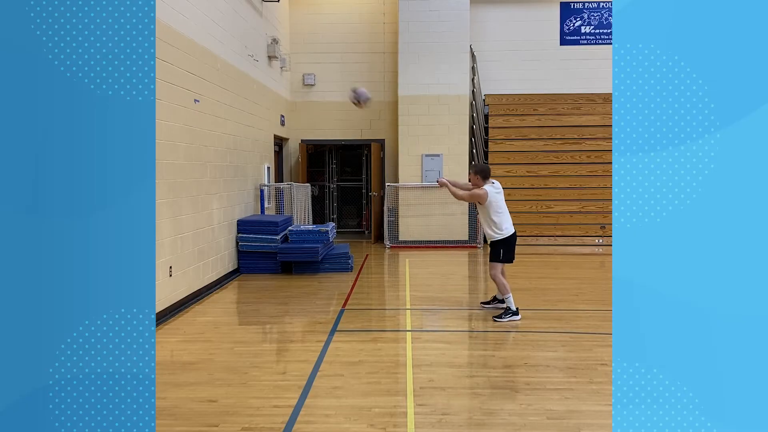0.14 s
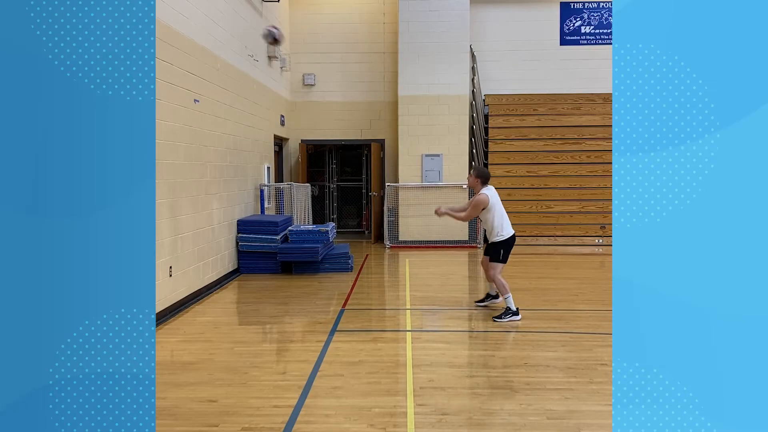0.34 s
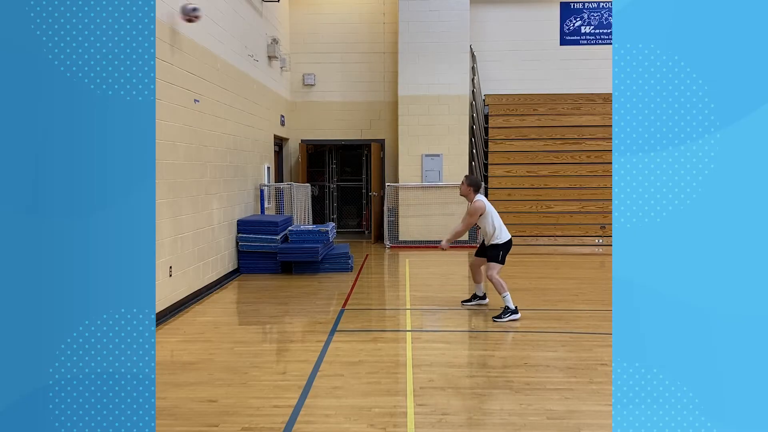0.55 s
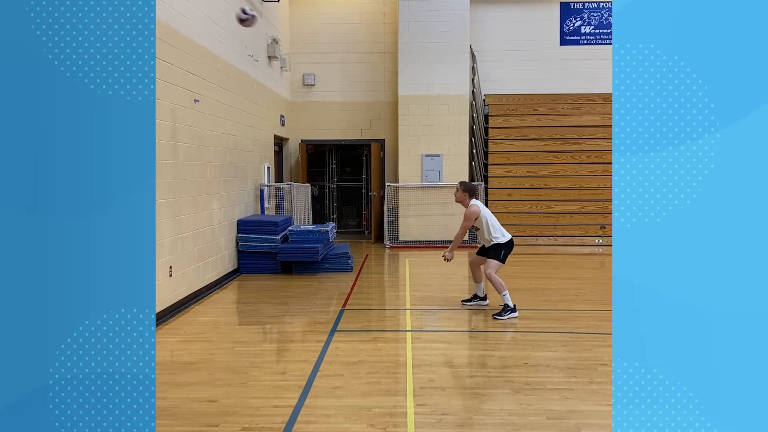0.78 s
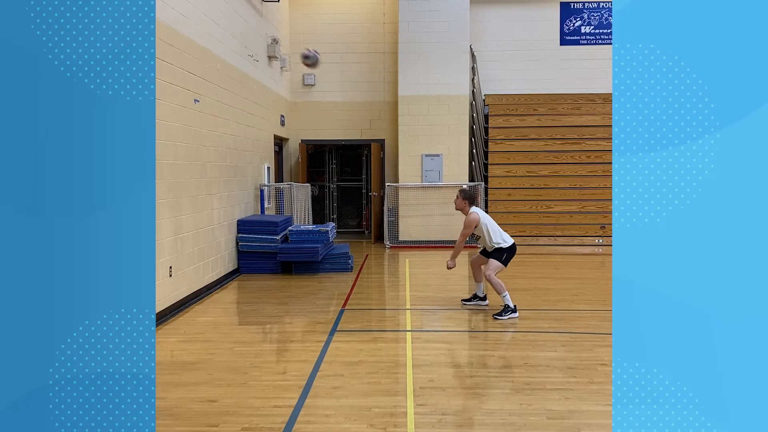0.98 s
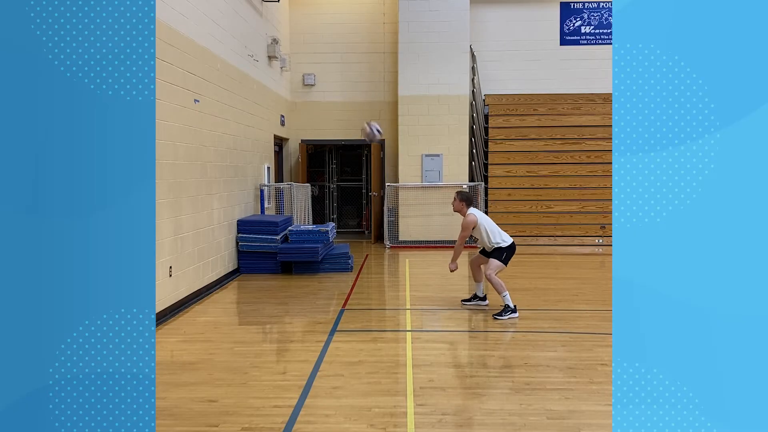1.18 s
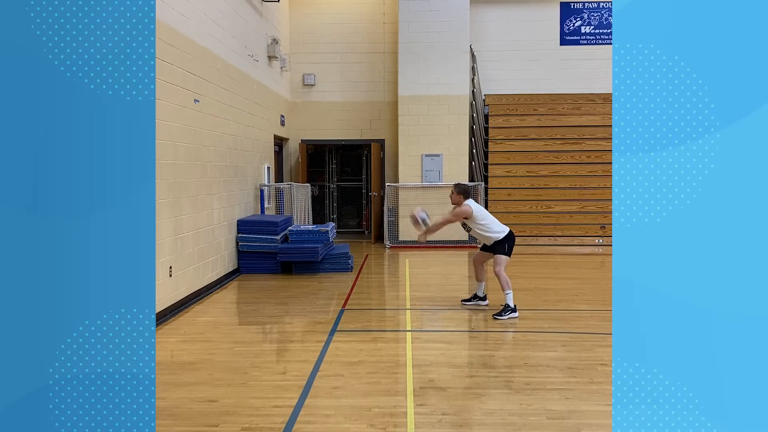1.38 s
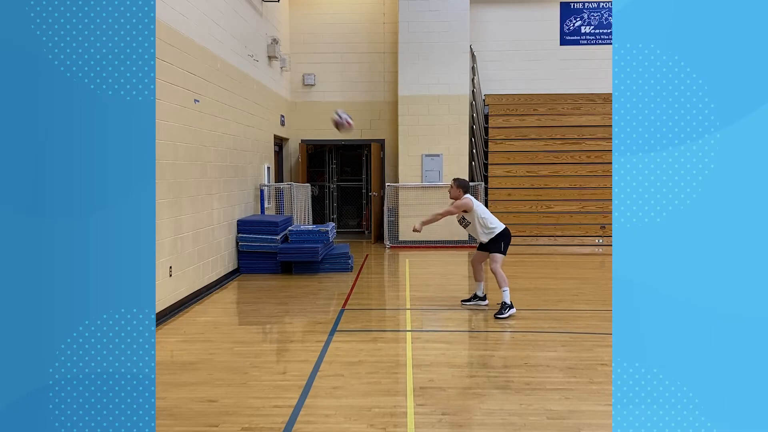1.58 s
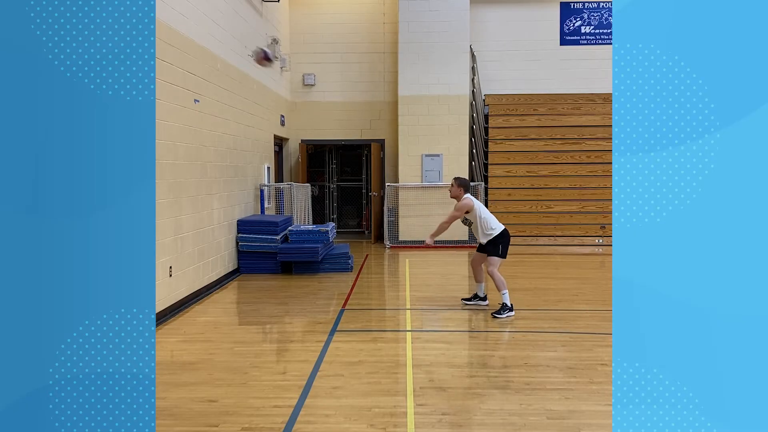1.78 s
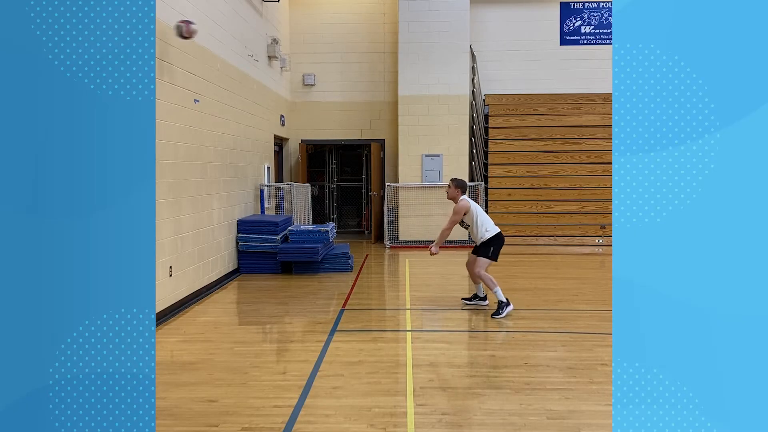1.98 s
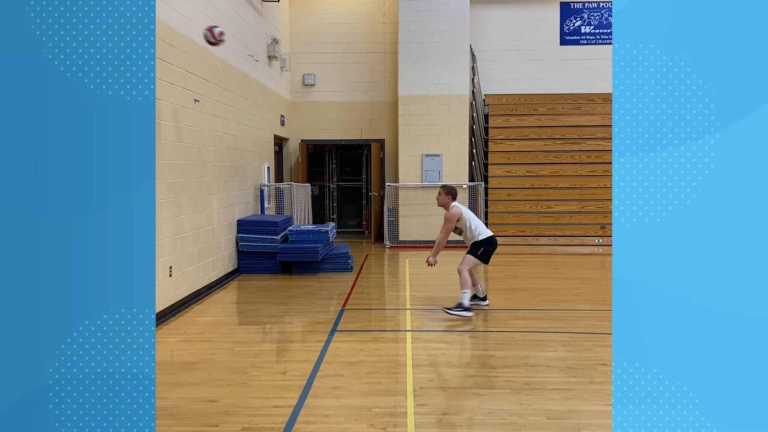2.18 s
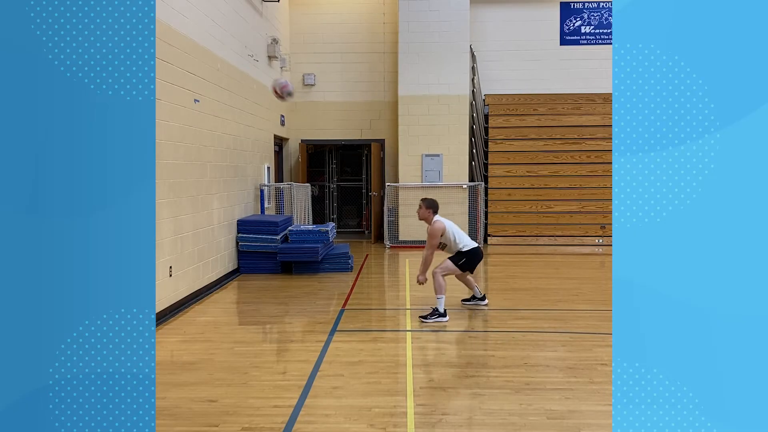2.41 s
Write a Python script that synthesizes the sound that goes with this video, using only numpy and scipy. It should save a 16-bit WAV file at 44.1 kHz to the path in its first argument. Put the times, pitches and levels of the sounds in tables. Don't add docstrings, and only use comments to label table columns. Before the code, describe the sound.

Volleyball smacked off bare forearms and knocking against a block wall, twice, in an echoing gym

```python
import sys
import numpy as np
from scipy import signal
from scipy.fft import rfft, irfft
from scipy.io import wavfile

SR = 44100
rng = np.random.default_rng(int(sys.argv[2]) if len(sys.argv) > 2 else 0)


def wav_record(signal):
    frames = np.transpose(np.atleast_2d(signal))
    bounded = np.clip(frames, -1, 1)
    quanta = np.round(bounded * 32767).astype(np.int16)
    wavfile.write(sys.argv[1], SR, quanta)


def volts(x):
    e = np.asarray(x, float) / 20
    return 10 ** e


N = 107956
LEAD, SIZE = 4410, 2 ** 17
HZ = np.maximum(np.arange(SIZE // 2 + 1) * SR / SIZE, 10)


def rms_one(x):
    return x / np.sqrt(np.mean(x ** 2) + 1e-20)


def at_hz(points, hz):
    table = np.array(points)
    return np.interp(np.log(hz), np.log(table[:, 0]), table[:, 1])


def ring(push, hz, t60):
    r, w = volts(-60 / (t60 * SR)), 2 * np.pi * hz / SR
    return signal.lfilter([0, np.sin(w)], [1, -2 * r * np.cos(w), r * r], push + 1e-18)


def coloured(points, size, tilt_db=0.0):
    hz = np.maximum(np.arange(size // 2 + 1) * SR / size, 10)
    colour = volts(at_hz(points, hz) + tilt_db * np.log2(hz / 2000))
    return rms_one(irfft(rfft(rng.standard_normal(size)) * colour, size))


def delay(s):
    return np.exp(-2j * np.pi * HZ * (s + LEAD / SR))


def add(heard, x, s, side):
    i = LEAD + int(round(s * SR))
    heard[:, i:i + len(x)] += x * np.array([[1], [side]])


# frequency [Hz], side over mid [dB].
DIFFUSE_SIDE = [(50, -36), (150, -25), (350, -13), (700, -3.5), (2000, -5.5), (5000, -4), (8000, -3),
                (13500, -3)]
# frequency [Hz], share [0-1].
PORT_LAG_SHARE = [(100, 0.6), (1000, .4), (4000, .6), (8000, .9)]


def wide(pair):
    lag = np.clip(at_hz(PORT_LAG_SHARE, HZ), 0, 1)
    side = 1j * lag * pair[0] + np.sqrt(1 - lag ** 2) * pair[1]
    return np.array([pair[0], side * volts(at_hz(DIFFUSE_SIDE, HZ))])


# frequency [Hz], side over mid [dB].
DIRECT_SIDE = [(50, -28), (150, -17), (350, -6), (700, -2), (1200, -4), (2700, 7), (7500, 8), (13500, 9)]


def facing(heard):
    return rfft(heard) * np.array([1 + 0 * HZ, 1j * volts(at_hz(DIRECT_SIDE, HZ))])


# frequency [Hz], level [dB per Hz].
HUM = [(25, -12), (60, 9.5), (130, 0), (430, -22), (530, -33), (1900, -35), (3200, -53.5), (12000, -68)]


def hall_hum():
    pair = rfft([coloured(HUM, size=SIZE), coloured(HUM, size=SIZE)])
    return volts(-45.5) * wide(pair)


# frequency [Hz], time to fall 60 dB [s].
GYM_T60 = [(50, 2.7), (130, 2.5), (350, 1.905), (920, 1.825), (2430, 1.416), (6400, 1.05), (11000, .66),
           (15000, .27)]


def tail():
    build_s, lumps_db = 0.0062, 2.5
    t, out = np.arange(N + LEAD) / SR, 0
    edges = 28 * 2 ** np.arange(0, 9.6, .5)
    white = rng.standard_normal((2, 2, N + LEAD))
    for k, (low, high) in enumerate(zip(edges, edges[1:])):
        band = signal.sosfilt(signal.butter(2, [low, high], "band", fs=SR, output="sos"), white[k % 2])
        lumps = np.interp(t * 25, np.arange(100), rng.standard_normal(100))
        lumps = lumps_db * lumps * np.clip((900 / low) ** .3, 0, 1)
        fall = 60 * t / at_hz(GYM_T60, np.sqrt(low * high))
        out = out + band * volts(lumps - fall)
    return wide(rfft(out * (1 - np.exp(-t / build_s)) ** 2, SIZE))


def body_thump(body):
    t = np.arange(8192) / SR
    dent = np.exp(-((t - .001) / 0.00077) ** 2)
    push = sum(volts(db) * ring(dent, hz, t60) for hz, db, t60 in body)
    return -push / np.abs(push).max()


def falling_knock(knock):
    t = np.arange(4096) / SR
    _, db, from_hz, to_hz, glide_s, fall_s = knock
    turns = to_hz * t + (from_hz - to_hz) * glide_s * (1 - np.exp(-t / glide_s))
    return volts(db) * np.sin(2 * np.pi * turns) * (1 - np.exp(-t / .001)) * np.exp(-t / fall_s)


def smack(skin, stretch, modes):
    rise_s, fall_s, ring_db = .0004, .0013, -7
    t = np.arange(4096) / SR
    burst = skin * (1 - np.exp(-t / rise_s / stretch)) * np.exp(-t / fall_s / stretch)
    rings = sum(volts(db) * ring(burst, hz, t60) for hz, db, t60 in modes)
    return burst + volts(ring_db) * rings / np.abs(rings).max()


def ball(hits, echoes, modes, colour, body, knock, wet):
    scatter_per_s, dull_db_per_s = 30, -16
    out, heard = 0, np.zeros((2, SIZE))
    room = tail() * volts(at_hz(wet, HZ))
    thump, bend = body_thump(body), falling_knock(knock)
    treble = HZ ** 2 / (HZ ** 2 + 450 ** 2)
    for s, smack_db, thump_db, tilt_db in hits:
        bright_db = smack_db + tilt_db * np.log2(HZ / 2000)
        out = out + volts(treble * bright_db + (1 - treble) * thump_db) * delay(s) * room
        add(heard, volts(smack_db) * bend, s + knock[0], .2)
        skin = coloured(colour, size=4096, tilt_db=tilt_db)
        for lag, high_db, low_db, side, stretch in echoes:
            new = np.clip(scatter_per_s * lag, 0, 1)
            scattered = coloured(colour, size=4096, tilt_db=tilt_db + dull_db_per_s * lag)
            mixed = np.sqrt(1 - new ** 2) * skin + new * scattered
            add(heard, volts(smack_db + high_db) * smack(mixed, stretch, modes), s + lag, side)
            add(heard, volts(thump_db + low_db) * thump, s + lag, side)
    return out + facing(heard)


# start [s], smack [dB], thump [dB], brightness [dB per octave].
ARMS = [
    (-.001, -14.5, -12.5, -0.6),
    (1.4362, -14.5, -12, -0.5),
]
# delay [s], smack [dB], thump [dB], side share, stretch [times].
ARM_ECHOES = [(0, -0.5, -12.5, .3, 1.0), (.0048, 1.5, 6.5, .3, .9), (.0115, -19, -20, .3, 1.4),
              (0.0193, -15, -3, -.3, 1.5), (.0385, -12.5, -9.5, 0.5, 1.1), (.047, -24, -25, .4, 2.5),
              (0.076, -27, -12, -0.33, 4), (.135, -29, -20, .3, 4), (.1585, -24, -4, .7, 1.8),
              (.163, -25, -25, .2, 7), (.2, -31, -7, .2, 6), (.255, -38, -6, -0.37, 6),
              (.35, -38, -12, .2, 6)]
# frequency [Hz], level [dB], time to fall 60 dB [s].
ARM_MODES = [(430, -4, .04), (700, -5, .025), (949.4, -2, .022), (1215, -1, .018), (1830, -5, .012),
             (2600, -7, .01), (5330, -14, .015)]
# frequency [Hz], level [dB per Hz].
ARM_SMACK = [(300, -13), (1200, 1), (2500, -2), (3600, -9), (5400, -4), (9500, -4), (12500, -7),
             (16000, -18)]
# frequency [Hz], level [dB], time to fall 60 dB [s].
ARM_THUMP = [(75, -8, .13), (165, -2, .06), (244, -8, .04)]
# delay [s], level [dB], from [Hz], to [Hz], glide [s], fall [s].
ARM_KNOCK = (.0105, -9, 1300, 900, .004, .004)
# frequency [Hz], level [dB].
ARM_TAIL = [(35, -28), (85, 14.5), (150, 9.5), (420, -4.5), (560, -13), (1500, -15.5), (3500, -23.5),
            (10500, -27.5), (16000, -32)]


def forearm_passes():
    return ball(ARMS, ARM_ECHOES, ARM_MODES, ARM_SMACK, ARM_THUMP, ARM_KNOCK, ARM_TAIL)


# start [s], level [dB], frequency [Hz], time to fall 60 dB [s].
PANELS = [(.6905, -36, 781, .06), (.6905, -36, 1490, .06), (2.1415, -32, 861, .05),
          (2.1415, -47, 4040, .05), (2.109, -34, 1000, .04), (2.110, -40, 4600, .015),
          (2.152, -47, 4500, .03), (2.097, -33, 700, .035), (.648, -33, 651, .035), (.003, -24, 2000, .012),
          (.003, -28, 4000, .012), (.009, -28, 1500, .03), (.010, -36, 3200, .02), (.037, -36, 4100, .015),
          (.040, -35, 1050, .04), (.040, -37, 1870, .03), (.084, -35, 1750, .02), (.158, -37, 1280, .07),
          (1.457, -34, 600, .04), (1.488, -38, 780, .06), (1.490, -40, 1300, .05), (1.594, -39, 1230, .07)]


def panels():
    t, heard = np.arange(8192) / SR, np.zeros((2, SIZE))
    for s, db, hz, t60 in PANELS:
        swell = 1 - np.exp(-t / .002)
        add(heard, volts(db - 60 * t / t60) * swell * np.sin(2 * np.pi * hz * t), s, .3)
    return facing(heard)


def heel_thud(dry):
    start_s, db, hz, t60 = .487, -20, 120.5, 0.076
    t, i = np.arange(8192) / SR, LEAD + int(start_s * SR)
    landing = np.exp(-((t - .002) / 0.00086) ** 2)
    dry[i:i + 8192] -= volts(db) * ring(landing, hz, t60) / 70


# start [s], level [dB], centre [Hz], level at 12 kHz [dB].
TAPS = [(0.5065, -46, 2500, -34), (.509, -43, 1900, -36), (.513, -48, 4500, -20), (.523, -52, 4400, -45),
        (0.5415, -42, 4630, -45), (.546, -51.5, 4500, -45), (2.238, -55, 2000, -45),
        (2.254, -44.5, 1000, -45)]


def sole_taps(dry):
    t = np.arange(512) / SR
    for s, db, hz, top_db in TAPS:
        i = LEAD + int(s * SR)
        colour = [(hz / 5, -9), (hz, 0), (hz * 1.57, -11), (12000, top_db)]
        dry[i:i + 512] += volts(db) * coloured(colour, size=512) * np.exp(-t / .002)


# frequency [Hz], level [dB per Hz].
SCUFF = [(1500, -5.5), (2800, -3), (3400, 6.5), (4100, -2), (5200, 2.5), (6300, -2), (7500, -20),
         (14000, -30)]


def sole_scuff(dry):
    peak_s, rise_s, fall_s, db, patchy_db = 2.368, .024, .028, -51, 3.0
    t = np.arange(SIZE) / SR
    u = t - LEAD / SR - peak_s
    grip_db = patchy_db * np.interp(t * 150, np.arange(500), rng.standard_normal(500))
    swell = np.exp(-(u / np.where(u < 0, rise_s, fall_s)) ** 2 / 2)
    dry += volts(db + grip_db) * coloured(SCUFF, size=SIZE) * swell


def shoes():
    dry = np.zeros(SIZE)
    heel_thud(dry)
    sole_taps(dry)
    sole_scuff(dry)
    direct = np.array([1 + 0 * HZ, .6j * volts(at_hz(DIFFUSE_SIDE, HZ))])
    return rfft(dry) * (volts(-38) * tail() + direct)


# start [s], smack [dB], thump [dB], brightness [dB per octave].
WALLS = [
    (.6455, -23, -25.5, -1.6),
    (2.0952, -24, -27.5, 0.5),
]
# delay [s], smack [dB], thump [dB], side share, stretch [times].
WALL_ECHOES = [(0, 3, -21, 0.15, 1.0), (.0031, 1.5, -7, .3, 1.05), (0.0124, -12, 13, .3, 2.2),
               (.0165, -13, -20, .3, 1.5), (.028, -22.5, -6, -.3, 3), (.0452, -10, -6, .3, 2.2),
               (.0488, -15, -18, .3, 4), (.059, -18, -25, .3, 4), (.075, -25, 5, .2, 5),
               (.103, -23, -9.5, -.3, 4), (.142, -23, -11.5, .3, 7), (.2, -28, -5.5, .3, 6)]
# frequency [Hz], level [dB], time
# to fall 60 dB [s].
WALL_MODES = [(675, 5, 0.03), (400, -2, .03), (982, -6, .022), (1305, -3, .02), (1630, -9, 0.015),
              (1965, -6, .014), (2555, -8, .013), (4700, -14, .012)]
# frequency [Hz], level [dB per Hz].
WALL_SMACK = [(450, -15), (900, 0), (2200, -1), (3600, -11), (5400, -8), (9500, -12), (12500, -14),
              (16000, -22)]
# frequency [Hz], level [dB], time to fall 60 dB [s].
WALL_THUMP = [(77, -1.5, .09), (129, 0, .04), (221.4, -9, 0.041)]
# delay [s], level [dB], from [Hz], to [Hz], glide [s], fall [s].
WALL_KNOCK = (.001, -6, 1500, 230, .004, .008)
# frequency [Hz], level [dB].
WALL_TAIL = [(35, -21), (80, 19), (150, 15), (420, -2.5), (560, -13), (2400, -18), (10500, -33.5),
             (16000, -44)]


def wall_bounces():
    return ball(WALLS, WALL_ECHOES, WALL_MODES, WALL_SMACK, WALL_THUMP, WALL_KNOCK, WALL_TAIL)


def scene():
    both = hall_hum() + forearm_passes() + panels() + shoes() + wall_bounces()
    mid, side = irfft(both, SIZE)[:, LEAD:LEAD + N]
    return np.array([mid + side, mid - side])


def dip(x, hz, width_hz, db):
    w, a = 2 * np.pi * hz / SR, np.tan(np.pi * width_hz / SR) / np.sqrt(volts(db))
    cut = [1 + a * volts(db), -2 * np.cos(w), 1 - a * volts(db)]
    return signal.filtfilt(cut, [1 + a, -2 * np.cos(w), 1 - a], x)


# frequency [Hz], width [Hz], depth [dB].
PORT_DIPS = [(6400, 1800, -1.5), (7050, 450, -14), (7700, 450, -14), (13100, 750, -14), (13900, 600, -14)]
# frequency [Hz], width [Hz], depth [dB].
SIDE_DIP = (10400, 800, -16)


def phone_microphone(dry):
    mid, side = (dry[0] + dry[1]) / 2, (dry[0] - dry[1]) / 2
    side = dip(side, *SIDE_DIP)
    side = signal.sosfiltfilt(signal.butter(5, 15300, fs=SR, output="sos"), side)
    mid = signal.sosfiltfilt(signal.butter(10, 15900, fs=SR, output="sos"), mid)
    for hz, width_hz, db in PORT_DIPS:
        mid = dip(mid, hz, width_hz, db)
    low_cut = signal.butter(4, 57, "high", fs=SR, output="sos")
    return signal.sosfilt(low_cut, [mid + side, mid - side])


def low_pass(x):
    return signal.sosfilt(signal.butter(12, 16890, fs=SR, output="sos"), x)


def record(dry):
    mix = phone_microphone(dry)
    return low_pass(mix)


dry = scene()
out = record(dry)
wav_record(out)
```